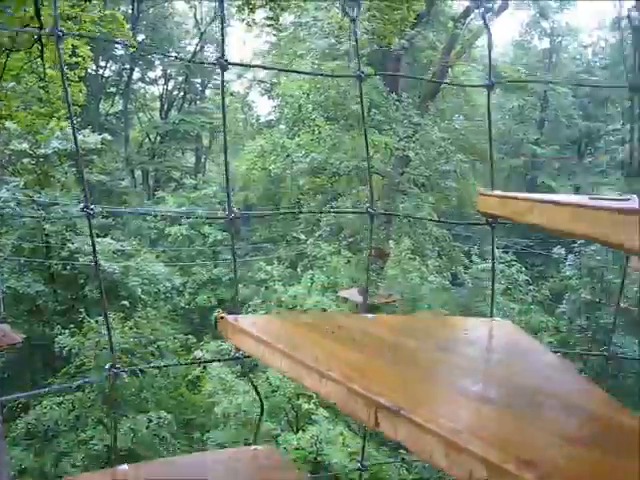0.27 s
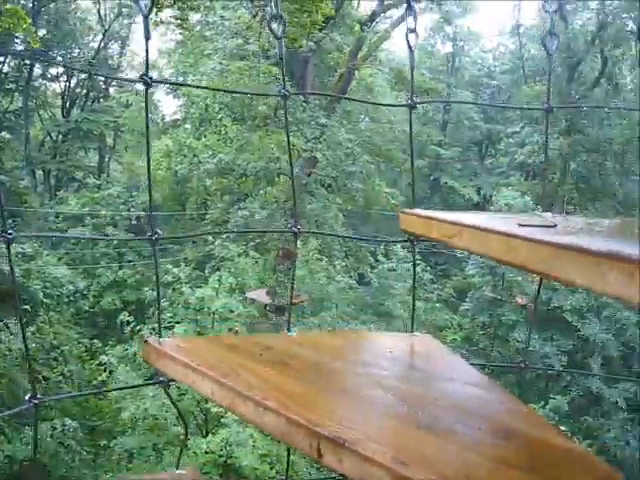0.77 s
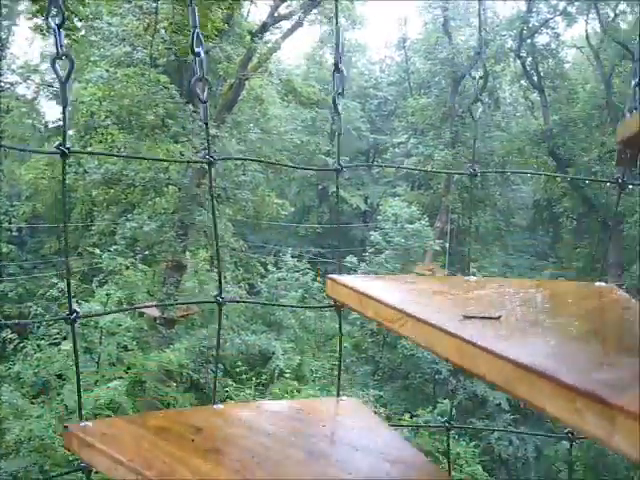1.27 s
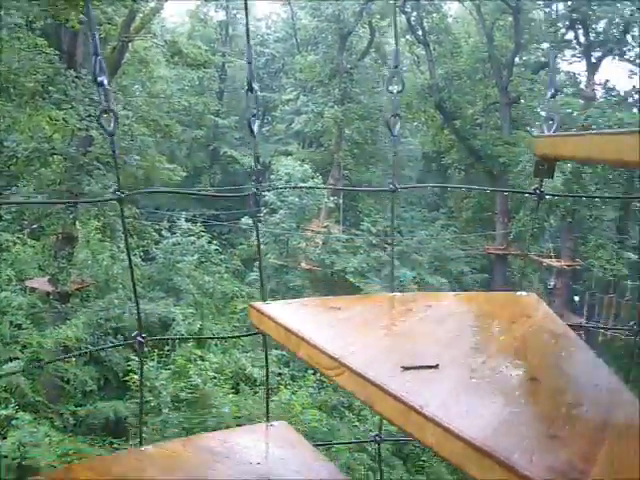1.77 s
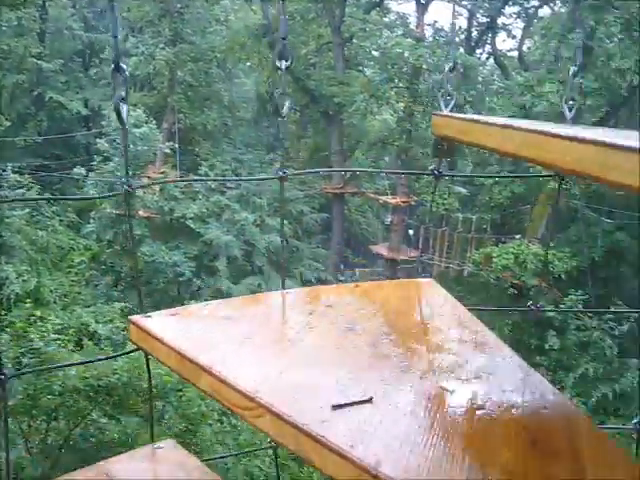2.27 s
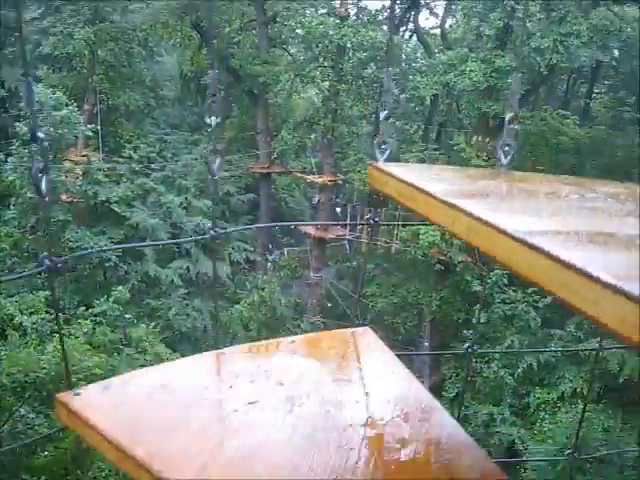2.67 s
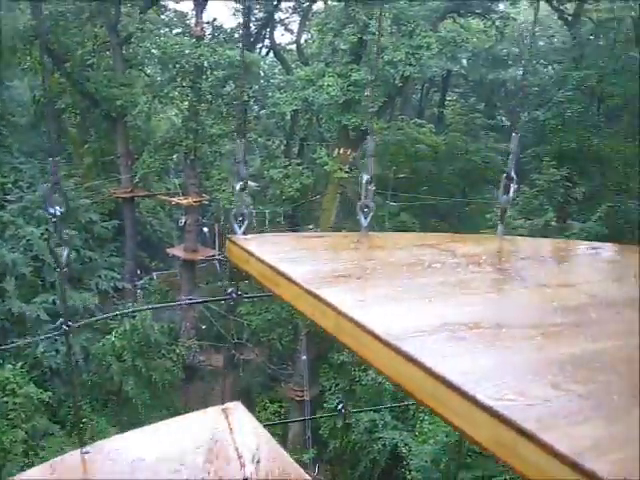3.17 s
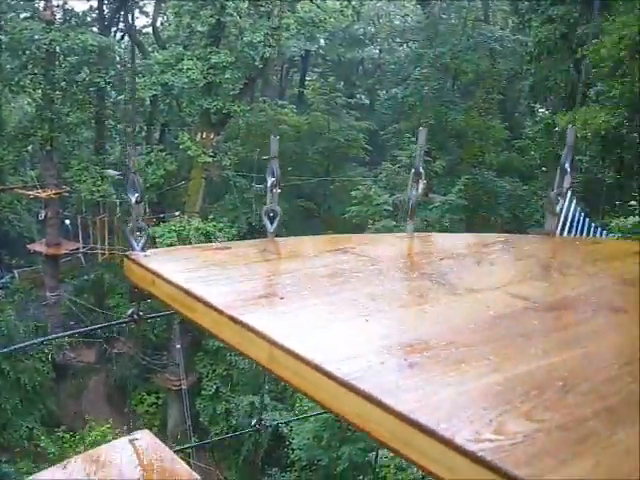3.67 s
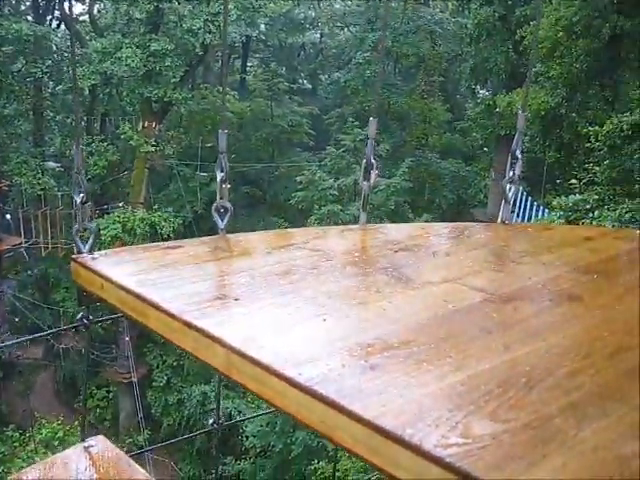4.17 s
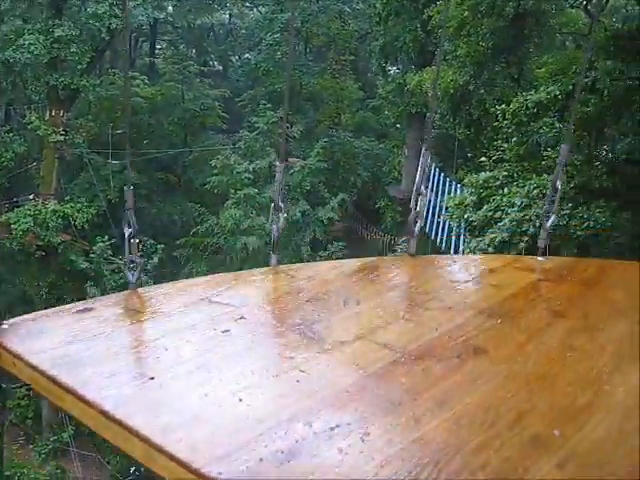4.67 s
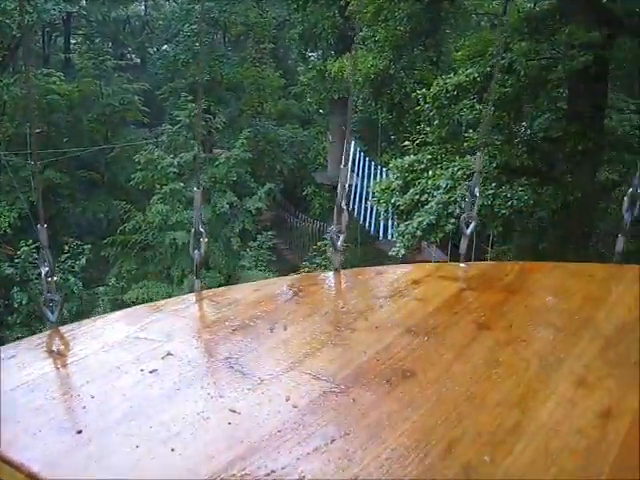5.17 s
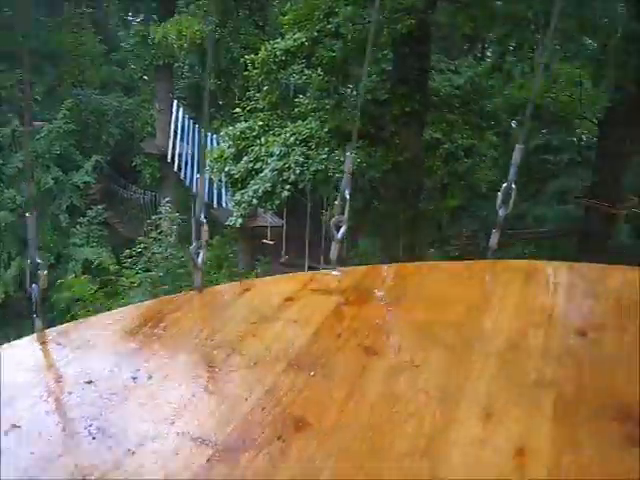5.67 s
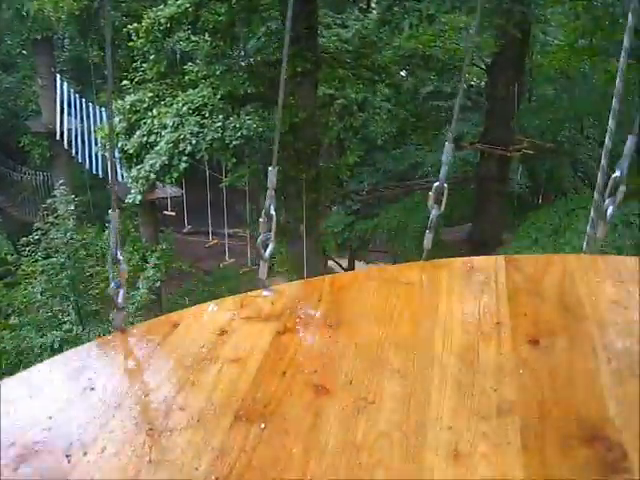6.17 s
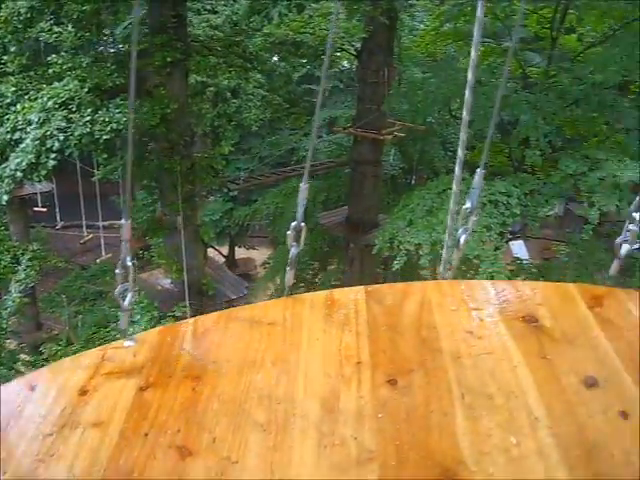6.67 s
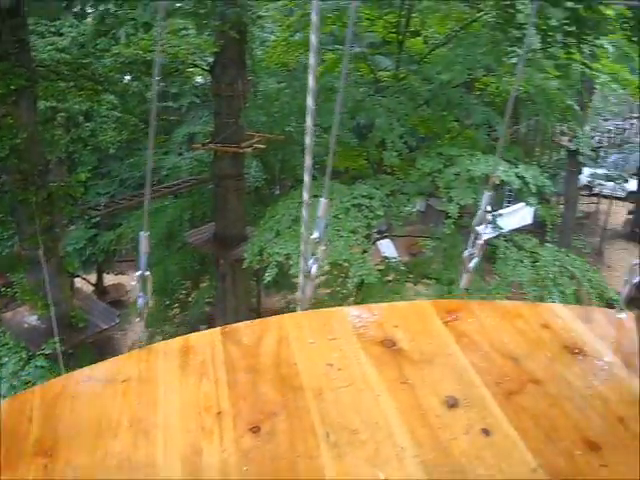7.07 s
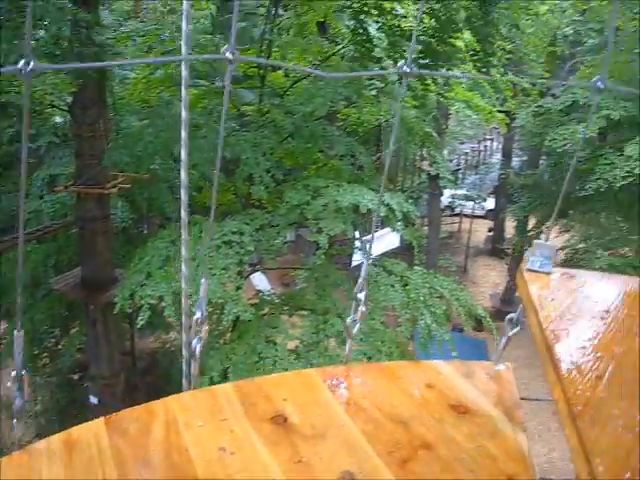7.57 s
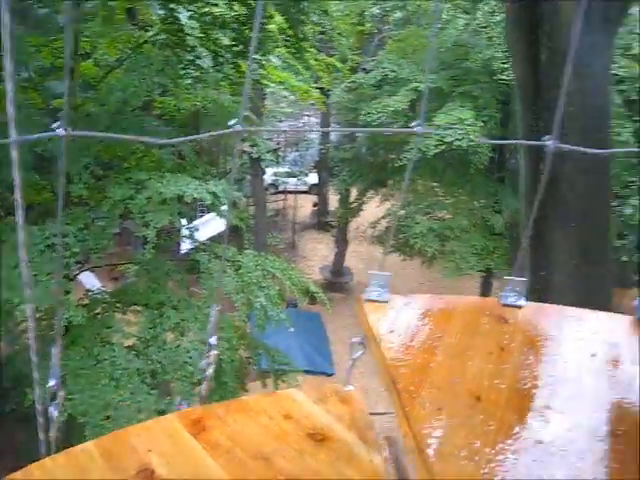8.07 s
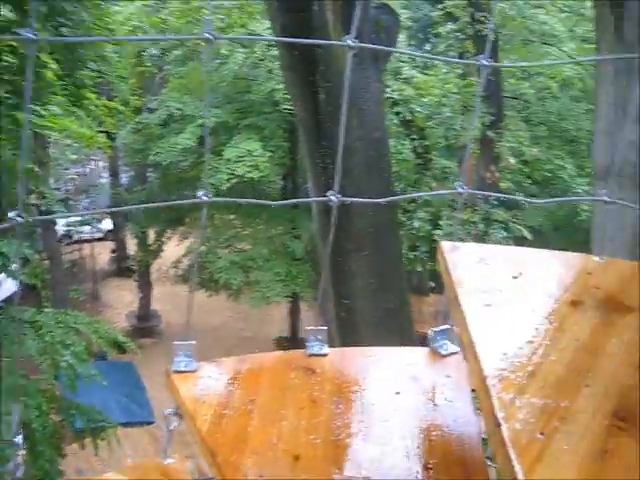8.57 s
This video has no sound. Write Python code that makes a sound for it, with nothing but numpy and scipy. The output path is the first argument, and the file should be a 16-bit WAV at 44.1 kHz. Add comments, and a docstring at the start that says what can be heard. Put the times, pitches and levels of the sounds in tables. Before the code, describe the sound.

Among trees, a constant wash of rain on foliage surrounds a close microphone. Early on a drip gives a clear, short plink; then single heavy drops hit wet wooden planks nearby as sharp, uneven taps, coming faster midway and thinning toward the end. Now and then one knocks on the microphone housing with a low thump. Faint spatters on leaves and more distant drips fill the gaps, with hardly any echo.

```python
"""Steady rain hisses through a forest canopy, countless small impacts merging into one wash.
Heavy drops from the branches crack and slap on a wet wooden platform, a few thud on the case of
a hand-held mono camera, and one plinks clearly. Others spatter on leaves and patter farther off,
and the trees faintly answer the drips. A limiter ducks the hiss for an instant after the
hardest hits."""
import sys
import numpy as np
from scipy import signal
from scipy.fft import rfft, irfft, next_fast_len
from scipy.io import wavfile
from scipy.ndimage import map_coordinates

SR = 44100
rng = np.random.default_rng(int(sys.argv[2]) if len(sys.argv) > 2 else 0)


def persist_wave(psi):
    """Save psi, clipped to +-1, as 16-bit WAV."""
    counts = np.round(np.clip(psi, -1, 1) * 32767).astype(np.int16)
    wavfile.write(sys.argv[1], SR, np.atleast_2d(counts).T)


N = 388521

# Tone of the rain bed's low, mid and top layers: freq_hz, relative_db
MURMUR_EQ = [(15, -62), (25, -49), (59, -8), (147, -9), (202, -11), (232, -7), (312, -8), (391, -7),
             (426, -8.5), (694, -2), (1490, -0.5), (1600, -1.5), (2080, -11.5), (3520, -120)]
HISS_EQ = [(700, -13), (1300, -13.5), (1800, -1), (3000, 1), (4200, -0.5), (5300, -3.5), (6500, -9),
           (9000, -29), (15000, -47)]
SPRAY_EQ = [(3500, -12), (6000, -2.5), (7500, 0), (9500, -2.5), (12000, -7), (14000, -13), (15800, -19)]
def canopy(murmur_db=-33.5, hiss_db=-26, spray_db=-35, swell_db=0.18, easing_db_per_s=0.1028):
    """Far trees murmur, nearer leaves hiss and fine spray fizzes, all easing slowly with the rain."""
    rainfall_db = swell_db * wobble(1) - easing_db_per_s * np.arange(N) / SR
    # each layer also has its own slight flurries
    murmur = amp(murmur_db + 0.49 * wobble(9)) * shower(MURMUR_EQ, 250, spread_db=1, grain_db=-7.5)
    hiss = amp(hiss_db + 0.45 * wobble(7)) * shower(HISS_EQ, 1100, spread_db=4.5, grain_db=-9)
    spray = amp(spray_db + 0.41 * wobble(15)) * shower(SPRAY_EQ, 760, spread_db=4.5, grain_db=-6)
    return amp(rainfall_db) * (murmur + hiss + spray)


def shower(eq, drops_per_s, spread_db, grain_db):
    """Countless far impacts merge into noise; nearer ones of uneven size stand out as grain."""
    wash = rng.standard_normal(N)
    clicks = (rng.random(N) < drops_per_s / SR) * rng.choice([-1, 1], N)
    sizes = amp(spread_db * np.minimum(rng.standard_normal(N), 2))
    grain = amp(grain_db) * unit(clicks * sizes)
    return unit(filtered(wash + grain, lambda hz: amp(along(eq, hz))))


# Close hits on the wood: start_s, spray_db, crack_db, slap_db, slap_pitch_hz, slap_delay_s
PLANK_HITS = [(.6925, -42, -28, -19.5, 1010, 0.0061), (0.733, -42, -32, -21, 1220, 0.0051),
              (1.278, -25, -20, -19, 1250, 0.005), (2.64, -38, -29, -23.5, 1670, 0.003),
              (2.7057, -19.5, -12.5, -15.5, 1510, 0.0031), (2.7332, -25, -31, -26, 1600, 0.011),
              (3.3736, -19, -12, -19, 1500, 0.0016), (3.441, -41, -21, -17.5, 1480, 0),
              (3.4843, -33, -27, -13.5, 880, 0.0028), (3.8711, -26, -13, -21, 1980, 0.00098),
              (4.238, -28, -16.5, -19, 1490, 0), (4.323, -33, -18.5, -14, 1440, 0.0023),
              (4.4955, -27, -22, -25, 1490, .0097), (4.578, -41, -14.5, -15.5, 790, .005),
              (4.718, -27, -17, -17.5, 1470, .0014), (4.9127, -30, -25, -28, 1710, 0),
              (4.9877, -23, -16.5, -19.5, 1360, .0033), (5.2661, -41, -23, -23, 710, 0.000033),
              (5.5011, -38, -19.5, -16, 795, 0), (5.536, -42, -35, -23, 790, 0),
              (5.6203, -28, -18, -18.5, 1280, 0.0064), (5.8717, -25, -18, -20.5, 845, 0.0016),
              (6.2812, -30, -20, -38, 1700, 0.034), (7.2913, -40, -34, -20.5, 1000, 0.00042),
              (7.6422, -38, -23, -22.5, 1380, .0054), (8.4233, -20, -21, -21, 1200, .0021)]
def planks():
    """Heavy drops fall from the branches onto the planks close by."""
    out = np.zeros(N)
    for start_s, *drop in PLANK_HITS:
        add(out, start_s, tap(*drop))
    return out


def tap(spray_db, crack_db, slap_db, slap_hz, slap_delay_s):
    """A drop cracks on the water film and throws spray; its bulk slaps the wood, which rings briefly."""
    t = np.arange(SR // 10) / SR
    hit = amp(spray_db) * burst(4100, 12400, t60=0.011, tail_db=-26, tail_t60=0.05)
    hit += amp(crack_db) * burst(1920, 4870, t60=0.014, tail_db=-21, tail_t60=0.082)
    knock = band(np.sin(2 * np.pi * slap_hz * t) * amp(2 - 60 * t / 0.01), 430, 3500)
    slap = burst(slap_hz * 0.49, slap_hz * 1.51, t60=0.02, tail_db=-9, tail_t60=0.061)
    add(hit, slap_delay_s, amp(slap_db) * (slap + knock))
    return hit


# Resonances of the camera's case: pitch_hz, relative_db, t60_s
CASE_MODES = [(184, 4, 0.069), (239, -4.5, 0.15), (349, 0, 0.094), (426, 0.5, 0.1), (530, -4, 0.043),
              (795, -17, .04)]
# Hits on the case:
# start_s, push_db, push_pitch_hz, push_cycles, splat_db, splat_pitch_hz, ring_db, ring_pitch_hz
CASE_HITS = [(.463, -11, 340, 0.81, -24, 900, -26, 318), (1.767, -13.5, 236, 0.64, -41, 900, -27, 240),
             (1.985, -2, 290, 0.61, -9.5, 1310, -10.5, 322), (3.235, -9, 714, 0.51, -14.5, 950, -14.5, 170),
             (4.689, -15.5, 435, 0.79, -24, 700, -28, 410), (5.26, -14.5, 231, 0.45, -15, 1160, -17, 397),
             (6.859, -2, 346, 0.25, -9.5, 650, -12.5, 288), (8.188, -23, 300, 1, -36, 900, -32, 320),
             (8.5524, -12, 480, 2.1, -20, 685, -16.5, 243)]
def thuds(sway_hz=65, sway_vs_splat_db=-23, sway_t60=0.3):
    """A drop shoves the microphone out and back; the case rings under a splat and sways on its mount."""
    out, t = np.zeros(N), np.arange(SR // 4) / SR
    lead_s = 0.01  # room for the push to build
    for start_s, push_db, push_hz, push_cycles, splat_db, splat_hz, ring_db, ring_hz in CASE_HITS:
        cycles = push_hz * (t - lead_s)
        swing = np.exp(-(cycles / np.where(cycles < 0, 0.49, push_cycles)) ** 2)
        splat = burst(splat_hz * 0.47, splat_hz * 1.38, t60=0.015, tail_db=-7, tail_t60=0.083)
        ring = np.zeros(len(t))
        for hz, db, t60 in CASE_MODES:
            mode_db = db - 18 * abs(np.log2(hz / ring_hz))  # the spot hit favours modes near one pitch
            ring += amp(mode_db - 60 * t / t60) * np.sin(2 * np.pi * (hz * t + rng.random()))
        rattle = amp(-3.5) * burst(170, 800, t60=0.08, tail_db=-14, tail_t60=0.11)
        sway = amp(sway_vs_splat_db - 60 * t / sway_t60) * np.sin(2 * np.pi * sway_hz * t)
        add(out, start_s - lead_s, amp(push_db) * swing * np.sin(2 * np.pi * cycles))
        add(out, start_s - 0.001, amp(splat_db) * splat)
        add(out, start_s + 0.002, amp(ring_db) * ring * (1 - np.exp(-t / 0.002)))
        add(out, start_s + 0.00284, amp(ring_db) * rattle)
        add(out, start_s, amp(splat_db) * sway)
    return out


# Short pitched blips, bubble plinks and a drop's tick: peak_s, level_db, pitch_hz, half_width_s
BLIPS = [(0.474, -4.5, 1900, 0.0049), (0.98, -25, 2300, 0.01), (4.913, -11.5, 1750, 0.0012),
         (6.964, -12, 3300, .001)]
def blips():
    """A trapped bubble plinks or a striking drop ticks: a tone swells and dies, its pitch sagging."""
    out, t = np.zeros(N), np.arange(-SR // 30, SR // 30) / SR
    for peak_s, level_db, pitch_hz, half_width_s in BLIPS:
        glide_hz = pitch_hz * (1 - 0.065 * np.tanh(t / half_width_s))
        phase = 2 * np.pi * np.cumsum(glide_hz) / SR
        tone = np.sin(phase) + amp(-17) * np.sin(2 * phase)
        add(out, peak_s + t[0], amp(level_db) * np.exp(-(t / half_width_s) ** 2) * tone)
    return out


# Splashes on wet leaves: peak_s, level_db, half_width_s
LEAF_HITS = [(1.42, -37, .04), (2.196, -31, .004), (2.52, -41, .006), (4.66, -42, .025), (6.46, -37, .05),
             (6.628, -35, 0.027), (8.26, -34, .008)]
def spatters():
    """A drop shatters on a leaf and its droplets land in a brief, bright sprinkle."""
    t = np.arange(N) / SR
    swell = sum(amp(db) * np.exp(-((t - peak_s) / half_s) ** 2) for peak_s, db, half_s in LEAF_HITS)
    bright_eq = [(4000, -23), (8000, 7), (13000, -4), (15800, -13)]
    return swell * shower(bright_eq, drops_per_s=1200, spread_db=21, grain_db=0)


def patter(count=110, level_db=-32.5, spread_db=2.5, pitch_hz=950):
    """Drips land on farther boards and leaves at random moments."""
    out = np.zeros(N)
    starts_s = rng.uniform(0, N / SR, count)
    for start_s, (size, wetness, detune) in zip(starts_s, rng.standard_normal((count, 3))):
        hit_db = level_db + spread_db * size
        spray_db = hit_db - 4.5 + 2.2 * wetness
        slap_hz = pitch_hz * np.exp(0.3 * detune)
        add(out, start_s, tap(spray_db, hit_db, hit_db, slap_hz, slap_delay_s=0.00198))
    return out


# Reverb decay among the trees: freq_hz, t60_s
FOREST_DECAY = [(200, 0.14), (1500, 0.15), (10000, 0.04)]
def forest(x):
    """Trunks and foliage scatter the sound into a short, dark tail."""
    hz, t, noise = signal.stft(rng.standard_normal(SR // 2), SR, nperseg=256)
    decay = amp(-60 * t / along(FOREST_DECAY, hz)[:, None])
    _, tail = signal.istft(noise * decay, SR, nperseg=256)
    return signal.fftconvolve(x, tail / np.linalg.norm(tail))[:N]


def burst(low_hz, high_hz, t60, tail_db, tail_t60):
    """A splash in one band: sharp attack, weaker droplet tail, with the energy of 3 ms at rms 1."""
    t = np.arange(SR // 10) / SR
    fade = amp(-60 * t / t60) + amp(tail_db - 60 * t / tail_t60)
    splash = band(rng.choice([-1, 1], len(t)) * fade, low_hz, high_hz)
    return splash / np.linalg.norm(splash) * np.sqrt(0.003 * SR)


def amp(db):
    """Decibels to gain."""
    return 10 ** (np.asarray(db) / 20)


def unit(x):
    """Scale to rms 1."""
    return x / np.sqrt(np.mean(x ** 2) + 1e-20)


def along(points, hz):
    """Read a curve of (freq_hz, value) points on a log frequency axis."""
    freqs, values = np.transpose(points)
    return np.interp(np.log(hz + 1), np.log(freqs + 1), values)


def wobble(knots_per_s):
    """Smooth random modulation."""
    knots = rng.standard_normal(int(N * knots_per_s / SR) + 4)
    return map_coordinates(knots, [np.arange(N) * knots_per_s / SR])


def filtered(x, response):
    """Zero-phase EQ with a gain of response(hz)."""
    size = next_fast_len(N + SR // 2)
    return irfft(rfft(x, size) * response(np.fft.rfftfreq(size, 1 / SR)), size)[:N]


def band(x, low_hz, high_hz):
    """Steep causal band-pass."""
    edges = np.clip([low_hz, high_hz], 1, SR / 2 - 1)
    return signal.lfilter(*signal.butter(3, edges, "bandpass", fs=SR), x)


def add(track, start_s, sound):
    """Mix a sound into the track at its cue."""
    part = track[max(0, round(start_s * SR)):][:len(sound)]
    part += sound[:len(part)]


def scene(reverb_db=-12.5):
    """All layers meet at one microphone; only the plank hits and patter feed the reverb."""
    drips = planks() + patter()
    mono = canopy() + spatters() + drips + amp(reverb_db) * forest(drips) + thuds() + blips()
    return np.array([mono, mono])


def limiter(x, ceiling_db, release_s):
    """The gain ducks when the level of the last 3 ms passes the ceiling, then eases back."""
    window = np.hanning(SR // 300)
    smooth = lambda v: np.convolve(v, window / window.sum())[:N]
    level_db = 10 * np.log10(smooth(x * x) + 1e-12)
    over_db = np.maximum(level_db - ceiling_db, 1e-9)
    recovery = np.arange(N) / SR / release_s
    # each overshoot decays exponentially until a larger one takes over
    duck_db = np.exp(np.maximum.accumulate(np.log(over_db) + recovery) - recovery)
    return x * amp(-smooth(duck_db))


def record(dry, top_hz=15850):
    """Limiter, clip at full scale and high cut; both channels carry the same signal."""
    limited = limiter(dry.mean(axis=0), ceiling_db=-11, release_s=0.019)
    mono = filtered(np.clip(limited, -1, 1), lambda hz: hz < top_hz)
    return np.array([mono, mono])


dry = scene()
out = record(dry)
persist_wave(out)
```